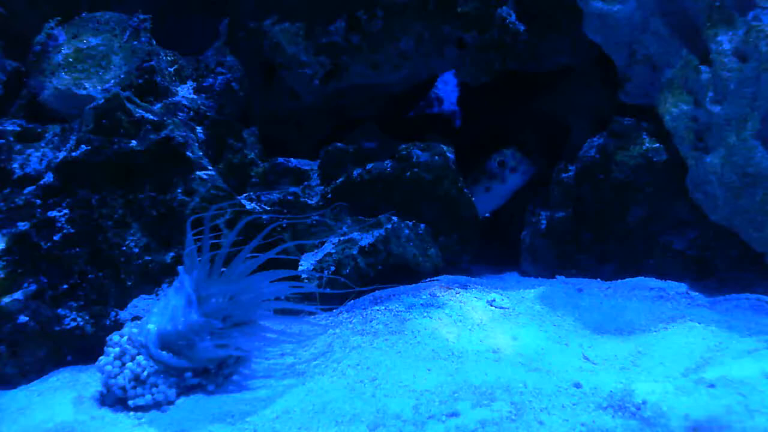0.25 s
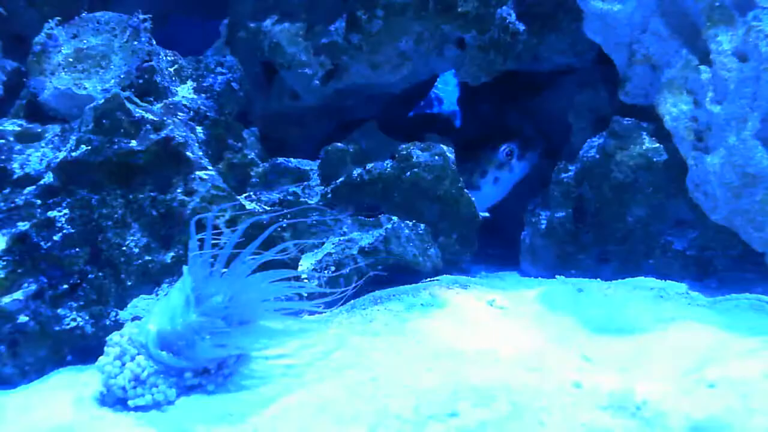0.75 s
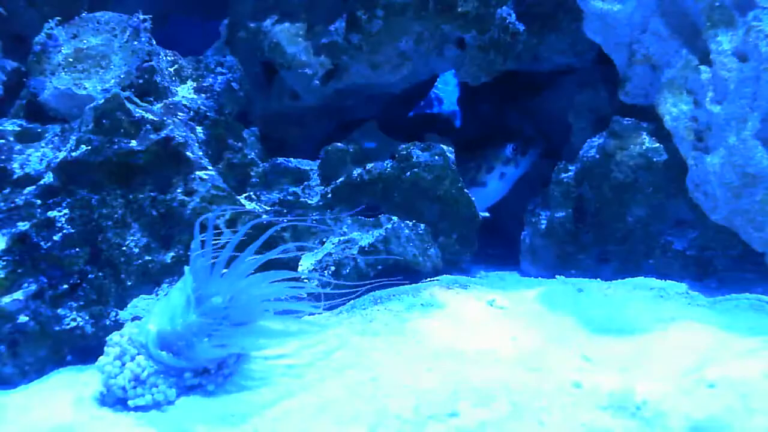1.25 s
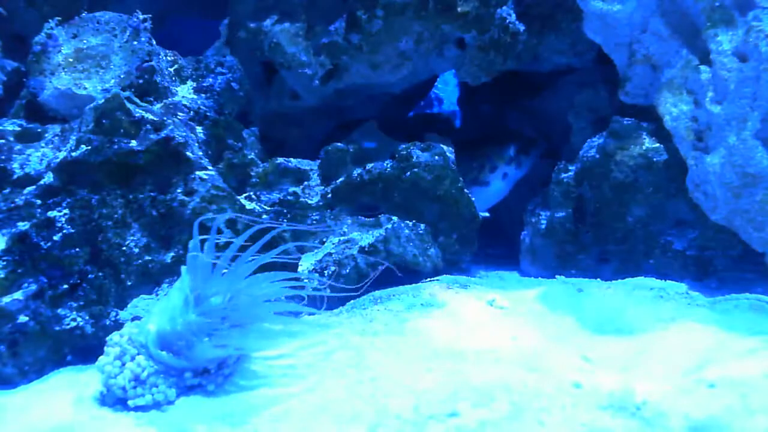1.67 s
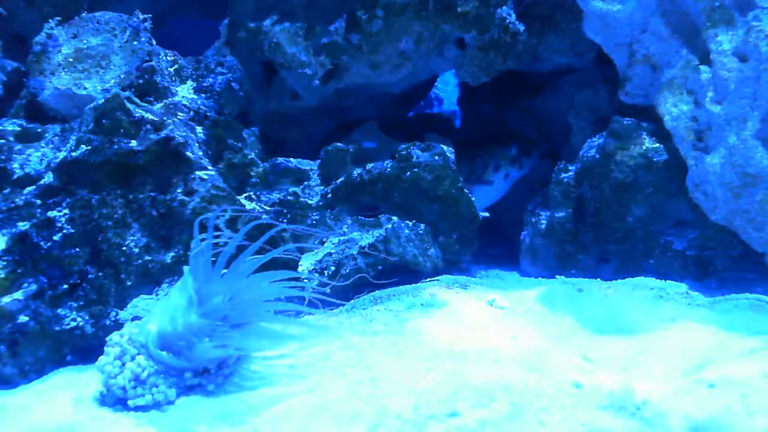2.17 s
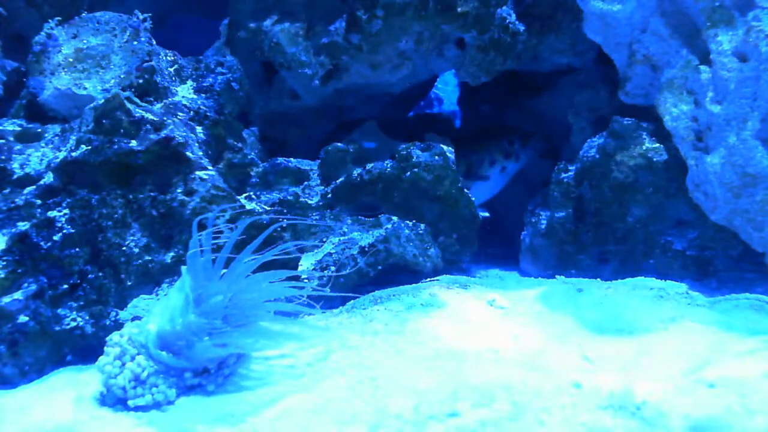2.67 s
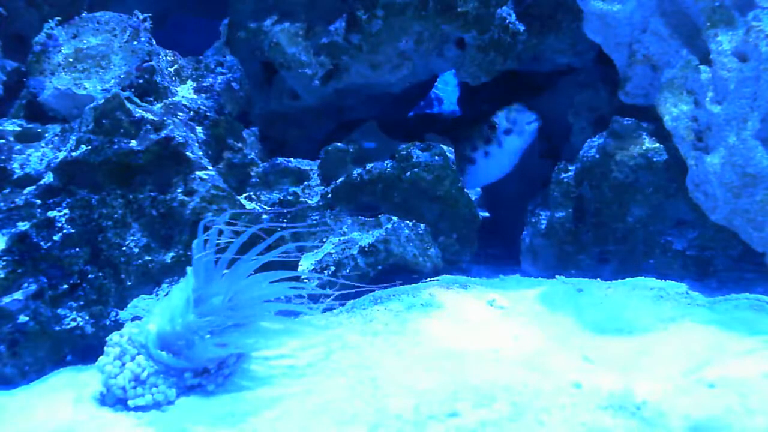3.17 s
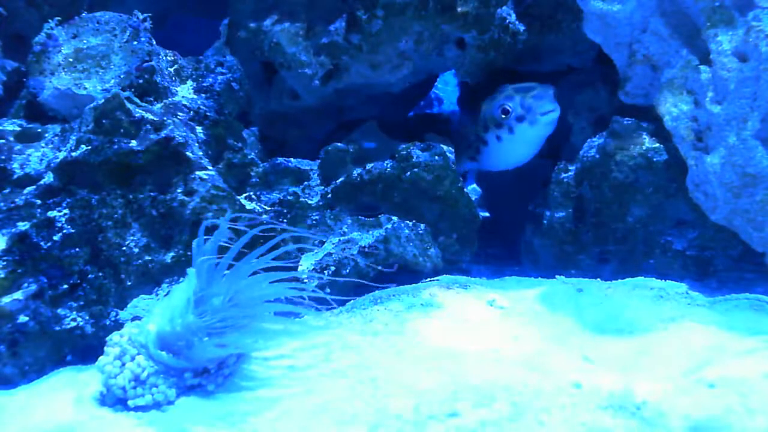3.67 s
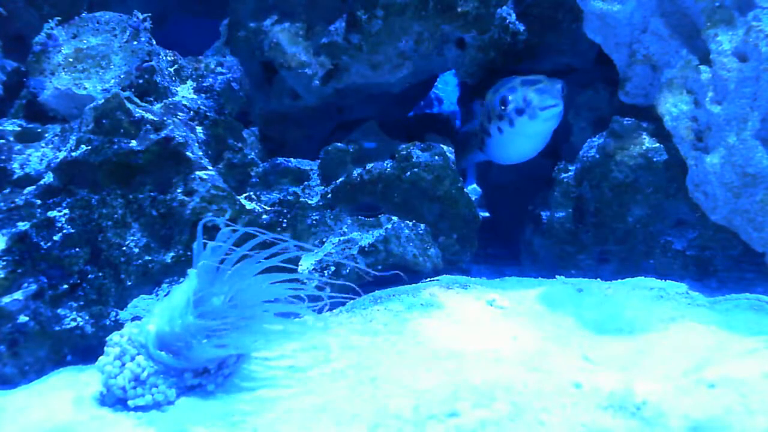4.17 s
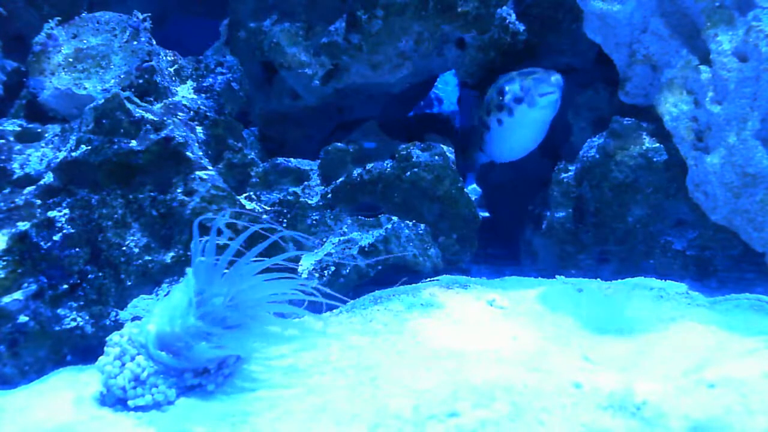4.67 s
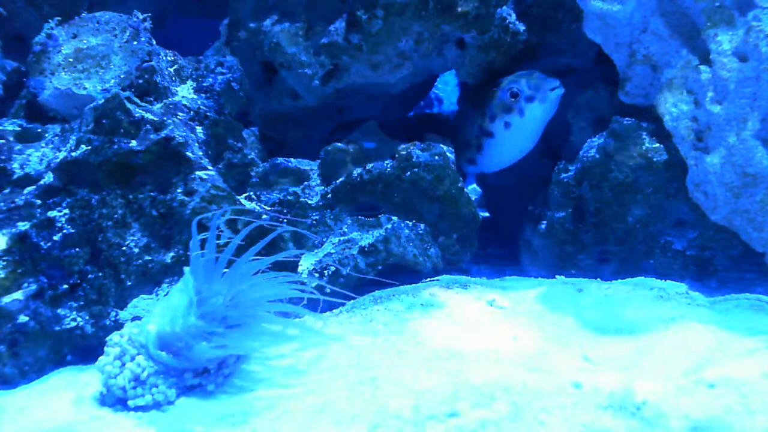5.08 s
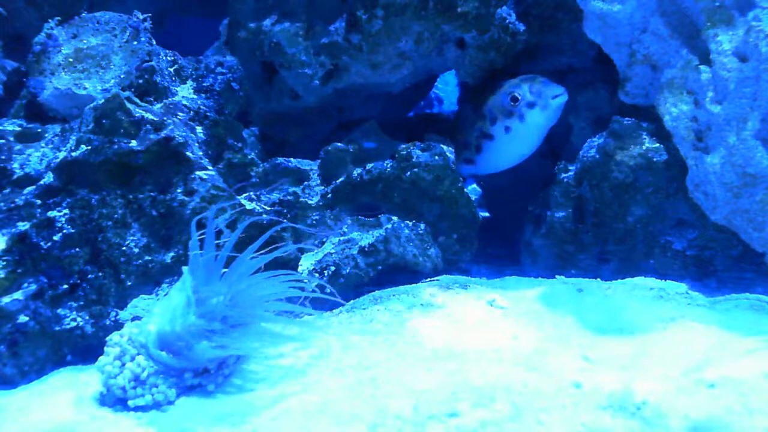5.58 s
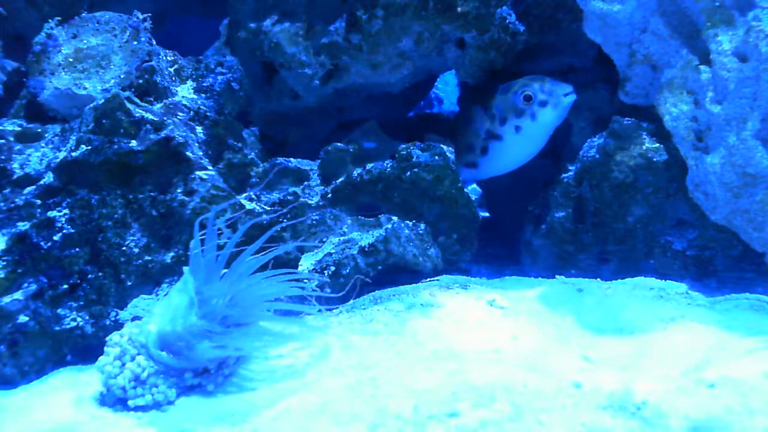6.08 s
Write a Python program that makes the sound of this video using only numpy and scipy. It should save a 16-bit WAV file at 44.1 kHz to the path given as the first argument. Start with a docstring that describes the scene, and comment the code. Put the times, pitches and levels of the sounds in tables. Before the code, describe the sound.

A short dull click and a blip of noise, a brief silence, then steady low aquarium pump hum with an even watery hiss in a small room.

```python
"""Reef tank pumps in a small room

Mains-driven pumps hum as sums of harmonics, and a slower motor beats against them beside a fan tone.
Circulating water is cabinet-coloured noise that churns and spits puffs of band-passed fizz.
Faint sine lines whine, and soft bumps rock the hand-held microphone.
The sound cuts in with a short blip, drops out, flicks on more quietly, then stays on."""
import sys
import numpy as np
from scipy import signal
from scipy.fft import rfft, irfft, next_fast_len
from scipy.io import wavfile

SR = 44100
rng = np.random.default_rng(int(sys.argv[2]) if len(sys.argv) > 2 else 0)


def file_out(sig):
    """Save sig as 16-bit WAV at sys.argv[1]."""
    # one column per channel
    cols = np.atleast_2d(sig).T
    # limit, then scale
    lim = np.clip(cols, -1, 1)
    pcm = np.round(lim * 32767).astype(np.int16)
    wavfile.write(sys.argv[1], SR, pcm)


N = 278315   # length in samples


def from_db(db):
    """Decibels to gain."""
    return 10 ** (np.asarray(db) / 20)


def rms_one(x):
    """Scale to rms 1."""
    return x / np.sqrt(np.mean(x ** 2) + 1e-20)


def drift(rate_hz):
    """Slow random wander of rms 1: noise through two equal one-pole lowpasses at rate_hz."""
    step = 40   # samples between control points
    pole = np.exp(-2 * np.pi * rate_hz * step / SR)
    noise = rng.standard_normal(N // step + 2002)
    slow = signal.lfilter([1], [1, -2 * pole, pole ** 2], noise)[2000:]   # drop the filter's run-in
    return np.interp(np.arange(N) / step, np.arange(len(slow)), rms_one(slow))


def tone(turns, level_db):
    """A sinusoid of the given rms level, its phase counted in turns."""
    return np.sqrt(2) * from_db(level_db) * np.cos(2 * np.pi * turns)


def band_fizz(centre_hz, spread):
    """Noise of rms 1 in a narrow band around one pitch."""
    edges_hz = [centre_hz / (1 + spread), centre_hz * (1 + spread)]
    band = signal.butter(2, edges_hz, "band", fs=SR, output="sos")
    return rms_one(signal.sosfilt(band, rng.standard_normal(N)))


def harmonics(turns, orders, flutter_db):
    """A sawtooth-like magnetic pull: a steady fundamental, and overtones that can flutter with the load."""
    out = tone(turns, orders[0][1])
    for multiple, level_db in orders[1:]:
        k = round(multiple)
        phase = k * turns - (k - 1) / 4   # quarter-turn steps align the overtones like a sawtooth's
        out = out + tone(phase, level_db + flutter_db * drift(2))
    return out


def hum(t):
    """The motor slips behind the mains, so the two swell together between three and four times a second."""
    mains_hz, motor_hz, fan_blade_hz = 59.99, 56.40, 293.7
    in_step_s = 1.566   # a moment when pumps and motor peak together
    skip_s, skip_jump_s, dip_s = 5.42, 0.00645, 0.0021
    # harmonics of the mains-driven pumps: multiple of the mains, level/dB rms
    pump_orders = [(1, -21), (2, -34), (3, -45.5), (4, -35.5), (5, -41.5), (6, -48.5), (7, -47.5),
                   (12, -52.5), (13, -58), (28, -64)]
    # harmonics of the slower motor: multiple of its rate, level/dB rms
    motor_orders = [(1, -35.5), (2, -50)]

    clock = t - in_step_s + skip_jump_s * (t > skip_s)   # the hum skips ahead once
    pumps = harmonics(mains_hz * clock, pump_orders, flutter_db=0.5)
    motor = harmonics(motor_hz * clock, motor_orders, flutter_db=0.0)
    # the cooling fan's blade tone beats with the fifth mains harmonic
    fan_turns = fan_blade_hz * clock + 0.055 * drift(0.94)
    fan = tone(fan_turns, -40 + 2.25 * drift(3.5))
    dip = 1 - np.exp(-((t - skip_s) / dip_s) ** 2)   # the level dips briefly where the hum skips
    return (pumps + motor + fan) * dip


def water(churn_db):
    """Turbulent flow: broad noise coloured by the cabinet, churning slightly."""
    # rush of the circulating water, before the cabinet: f/Hz, level/dB per Hz
    rush_points = [(15, -52), (45, -57), (120, -57), (300, -59), (450, -63), (650, -62.5), (1050, -65),
                   (1500, -73), (2300, -76)]
    # its hiss further up: f/Hz, level/dB per Hz
    hiss_points = [(3000, -79.5), (3900, -83), (4800, -87.5), (5900, -87.5), (7000, -90), (10000, -90),
                   (12500, -95), (15500, -93.5)]
    # resonances and nulls of cabinet and room: f/Hz, full width at half the dB/Hz, gain/dB
    cabinet_modes = [(158, 29, 6.5), (174, 12, -6), (210.9, 13.7, 10), (233, 6.2, -4.5), (269, 13, -5),
                     (359, 31, 4.5), (384, 20, -2.5), (483.5, 18, 5), (502, 14, -4), (556, 27, 3),
                     (606, 22, 4.5), (654, 20, 1), (765, 84, -2.5), (865, 19, 1), (1113, 27, -3.5),
                     (1115, 35, -2.5)]

    size = next_fast_len(N)
    hz = np.maximum(np.fft.rfftfreq(size, 1 / SR), 1)
    points_hz, points_db = np.transpose(np.concatenate([rush_points, hiss_points]))
    level_db = np.interp(np.log(hz), np.log(points_hz), points_db)
    for centre_hz, width_hz, gain_db in cabinet_modes:
        level_db = level_db + gain_db * 0.5 ** ((2 * (hz - centre_hz) / width_hz) ** 2)
    spectrum = rfft(rng.standard_normal(size)) * from_db(level_db)
    flow = irfft(spectrum, size)[:N] * np.sqrt(SR / 2)   # white noise scaled to 0 dB per Hz
    return flow * from_db(churn_db * drift(13.0))


def spits(t, rise_s, spread):
    """Bursting bubbles: a puff of narrow-band fizz that dies away under the hood."""
    t60_s = 0.15   # every spit dies away alike
    # the clearest spits at the water surface: t/s, f/Hz, level/dB rms ahead of rise and decay
    spit_list = [(.732, 11700, -49), (.874, 5250, -46), (.953, 7300, -49), (1.632, 7000, -45),
                 (1.636, 8600, -47), (2.206, 7400, -46), (2.24, 11000, -50), (2.638, 4200, -40.5),
                 (3.25, 4050, -44), (3.744, 8100, -47.5), (4.455, 4400, -46.5), (4.85, 11300, -51),
                 (6.037, 4200, -42), (6.238, 4100, -47)]

    out = np.zeros(N)
    for start_s, pitch_hz, level_db in spit_list:
        age = np.clip(t - start_s, 0, 1)
        rise = 1 - np.exp(-age / rise_s)
        decay = from_db(level_db - 60 * age / t60_s)
        out += band_fizz(pitch_hz, spread) * rise * decay
    return out


def tiny_spits(per_s, level_db, t60_s, spread):
    """Many fainter bubbles burst at random, each fizzing in one of eight bands."""
    out = np.zeros(N)
    decay = from_db(-60 / (t60_s * SR))   # gain per sample
    centres_hz = np.geomspace(4000, 11500, num=8)
    for centre_hz in centres_hz:
        struck = rng.random(N) < per_s / len(centres_hz) / SR
        bursts = struck * rng.uniform(0.5, 1, N)
        envelope = signal.lfilter([1], [1, -decay], bursts + 1e-18)
        out += envelope * band_fizz(centre_hz, spread)
    return from_db(level_db) * out


def whine(t, waver_db):
    """Faint high lines of the drive, each wavering a little in pitch and level."""
    # thin lines: f/Hz, level/dB rms
    whine_lines = [(2251, -67), (2364, -65), (3601, -64), (3714, -63.5), (4277, -74), (4979, -70),
                   (5039, -82), (8640, -69)]
    return sum(tone(hz * t + 0.1 * drift(1), db + waver_db * drift(2.3)) for hz, db in whine_lines)


def bumps(t):
    """Each bump rocks the microphone for a cycle or so: a low sine under a bell-shaped envelope."""
    rock_hz, rock_half_s = 18, 0.029
    # soft bumps of the hand on the microphone: t/s, swing level/dB ahead of the envelope
    bump_list = [(1.426, -17), (1.62, -23), (2.432, -19), (3.635, -23), (6.216, -14)]

    out = np.zeros(N)
    for centre_s, level_db in bump_list:
        swing = np.sin(2 * np.pi * rock_hz * (centre_s - t))
        envelope = np.exp(-((t - centre_s) / rock_half_s) ** 2)
        out += from_db(level_db) * swing * envelope
    return out


def switch_click(t, dull_hz, crack_db):
    """A one-sample crack and a quickly dying noise burst, both dulled by a one-pole lowpass."""
    click_s, click_db, t60_s = 0.0984, -23.5, 0.14   # just after the input first opens; level ahead of the gate
    decay = from_db(-60 * np.clip(t - click_s, 0, 1) / t60_s)
    burst = rng.standard_normal(N) * (t >= click_s) * decay
    burst[round(click_s * SR)] += from_db(crack_db)
    pole = np.exp(-2 * np.pi * dull_hz / SR)
    # the input gain holds the noise's rms through the lowpass
    return signal.lfilter([np.sqrt(1 - pole ** 2)], [1, -pole], from_db(click_db) * burst + 1e-18)


def scene():
    """Machines and steadily flowing water at one microphone."""
    t = np.arange(N) / SR
    machines = hum(t) + whine(t, waver_db=2.0)
    clear_spits = spits(t, rise_s=0.004, spread=0.081)
    faint_spits = tiny_spits(per_s=10, level_db=-56.5, t60_s=0.18, spread=0.079)
    return (machines + water(churn_db=0.51) + clear_spits + faint_spits + bumps(t))[None]


def record(dry):
    """The input switches abruptly, with a click and a step in its bias; the top is cut."""
    bias, close_s, cutoff_hz = -0.064, 0.0038, 15700   # bias in full scale
    # stretches in which the input is open: from t/s, to t/s, gain/dB
    open_spans = [(0.0974, 0.1337, -5.5), (0.334, .3587, -15), (0.3595, 7, 0)]

    t = np.arange(N) / SR
    gate = sum(from_db(db) * ((t >= start) & (t < end)) for start, end, db in open_spans)
    fade = np.exp(-1 / (close_s * SR))
    smoothed = signal.lfilter([1 - fade], [1, -fade], gate)
    gate = np.maximum(gate, smoothed)   # opens at once, closes softly
    switched = gate * (dry + bias + switch_click(t, dull_hz=169, crack_db=19))
    lowpass = signal.ellip(12, 0.1, 90, cutoff_hz, fs=SR, output="sos")
    return signal.sosfilt(lowpass, switched)


dry = scene()
out = record(dry)
file_out(out)
```